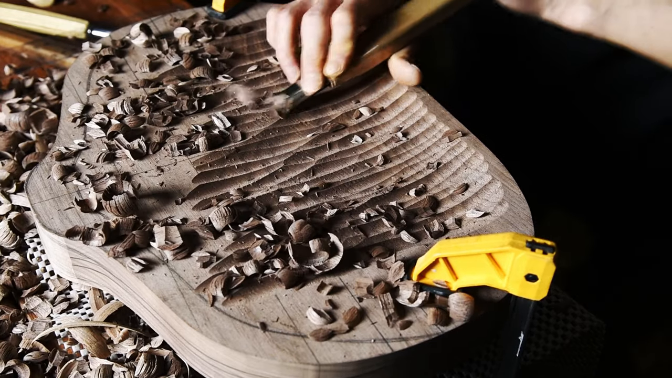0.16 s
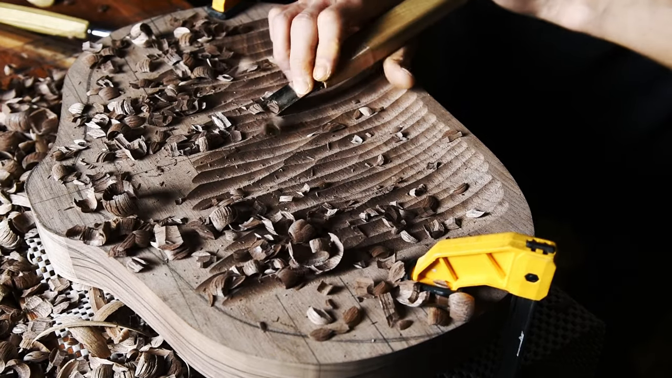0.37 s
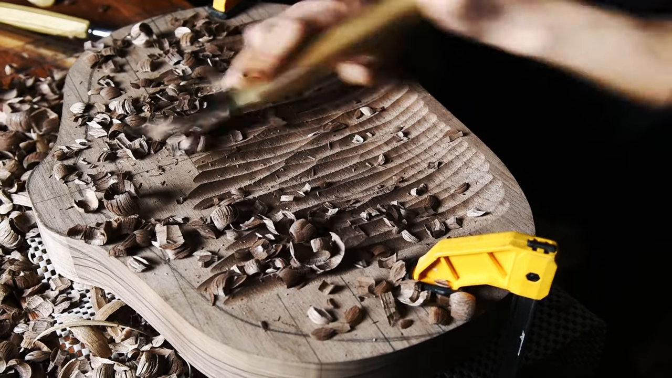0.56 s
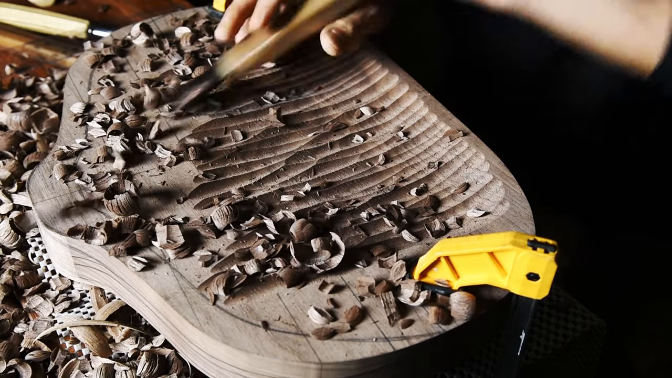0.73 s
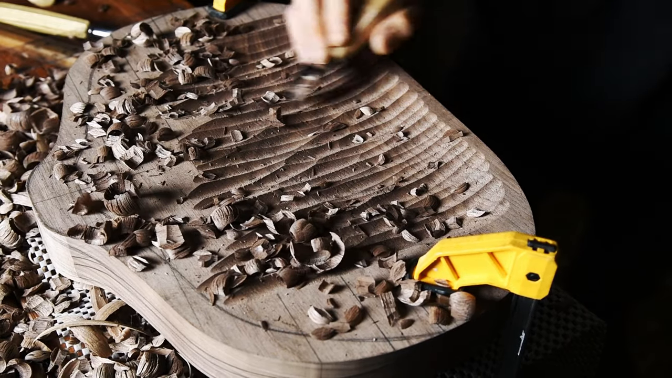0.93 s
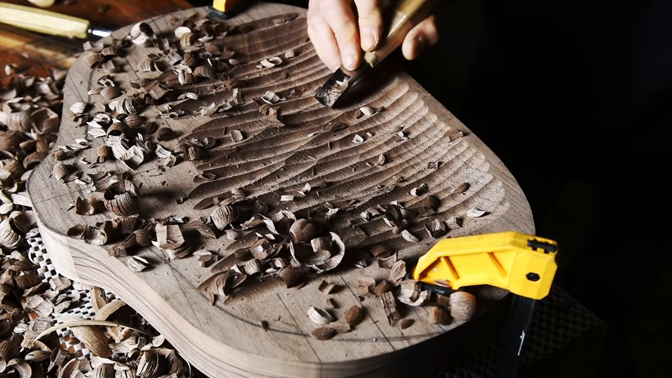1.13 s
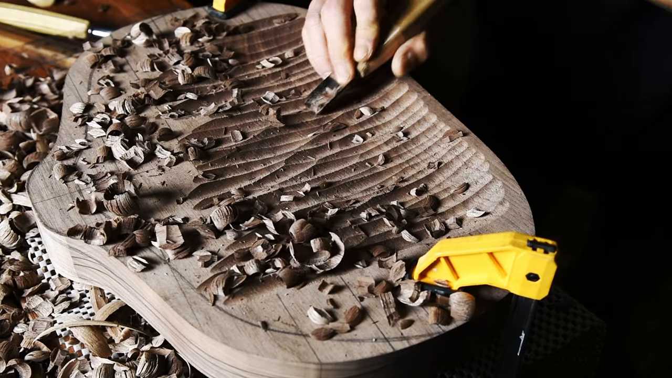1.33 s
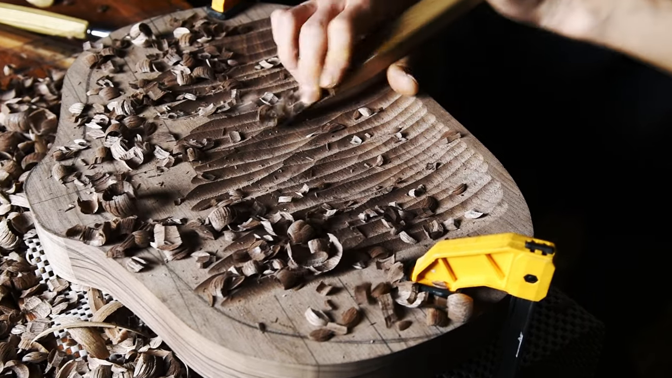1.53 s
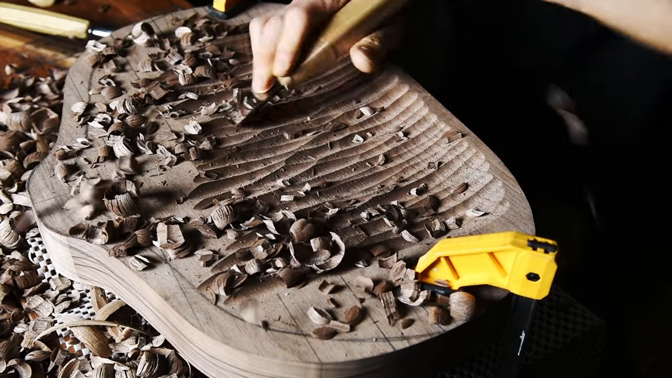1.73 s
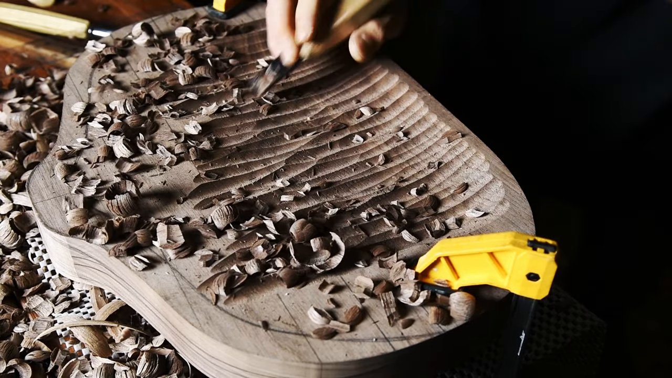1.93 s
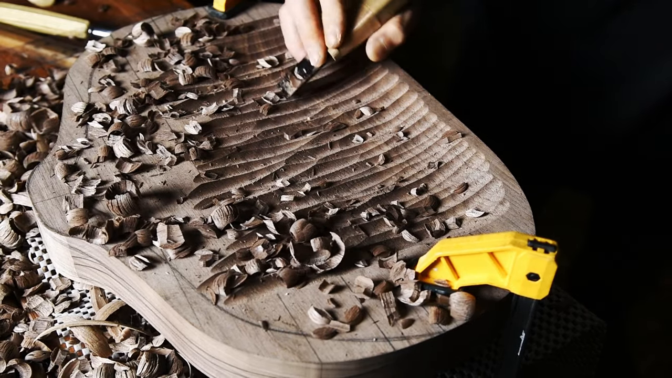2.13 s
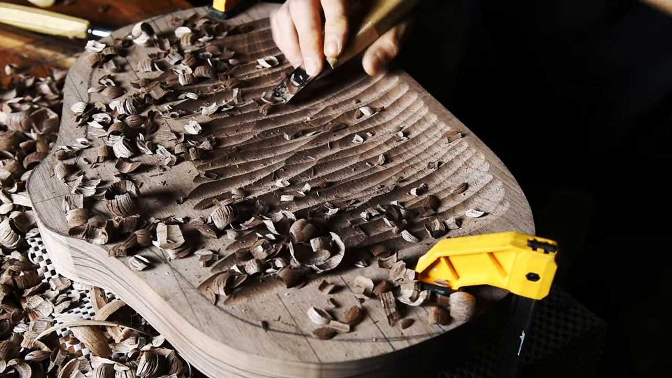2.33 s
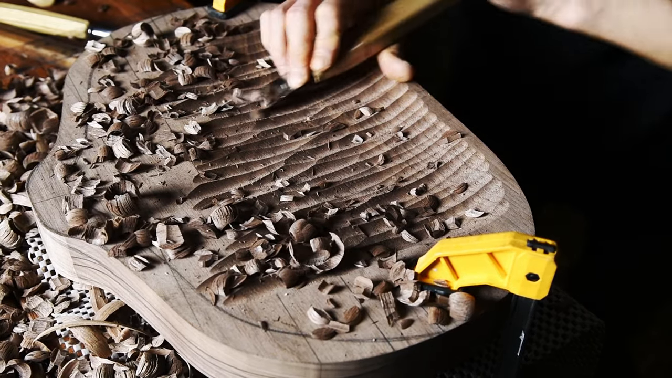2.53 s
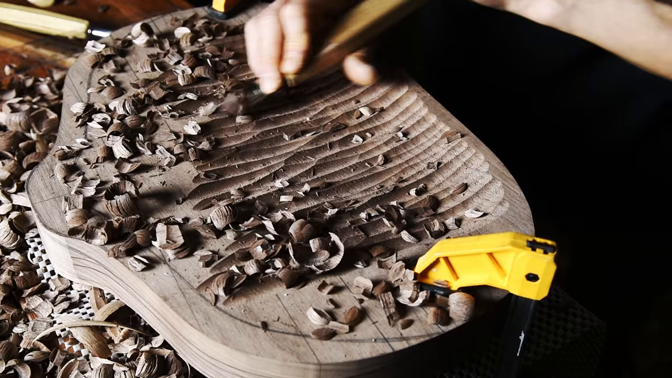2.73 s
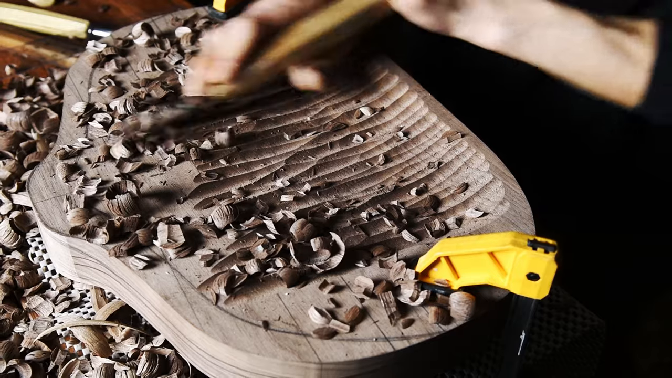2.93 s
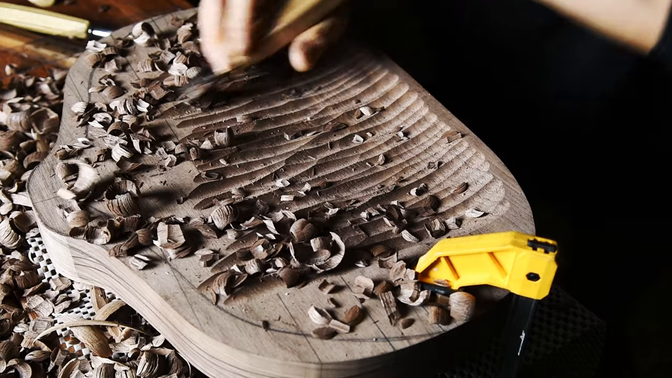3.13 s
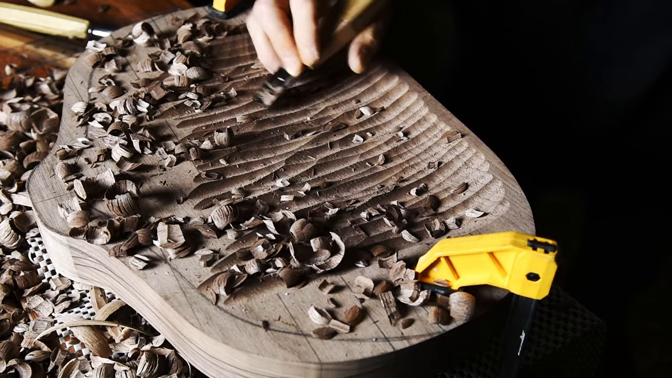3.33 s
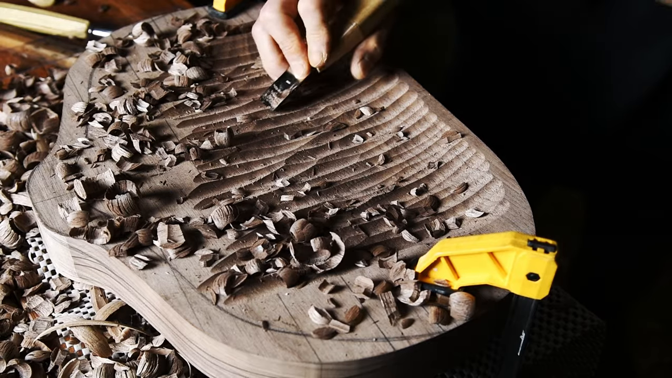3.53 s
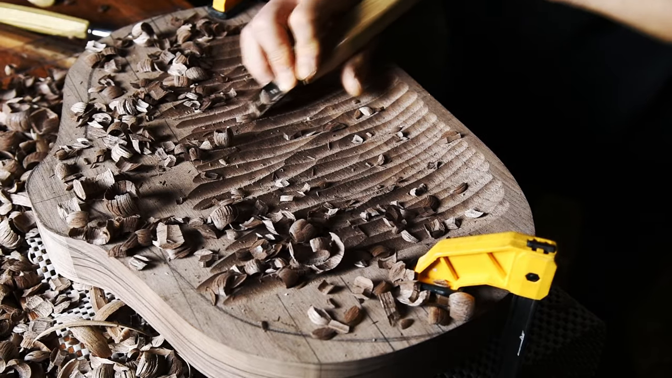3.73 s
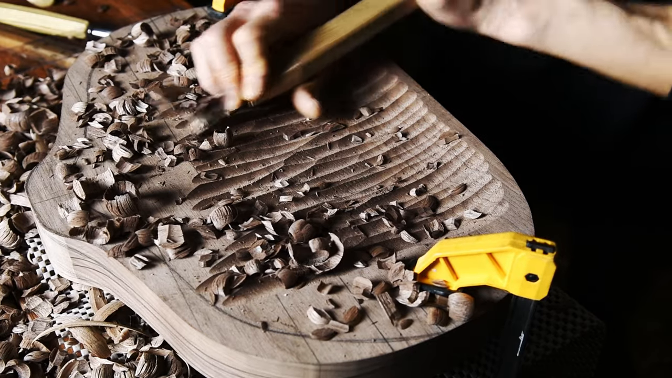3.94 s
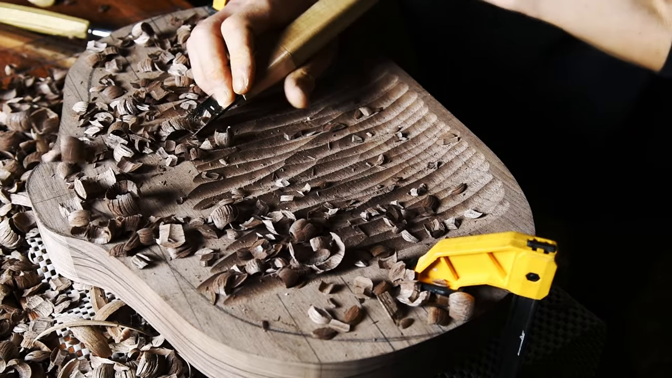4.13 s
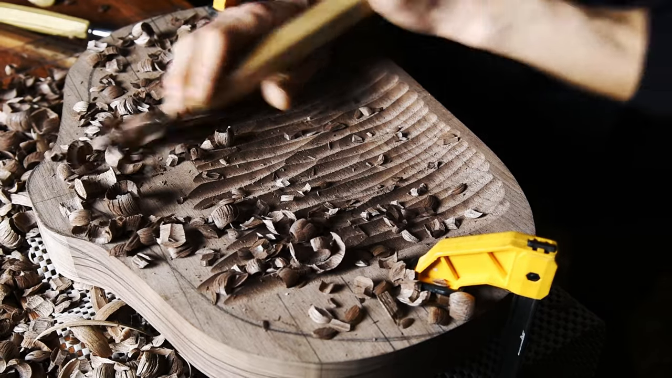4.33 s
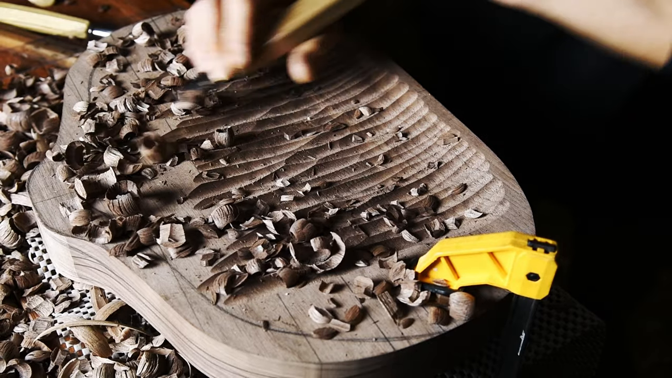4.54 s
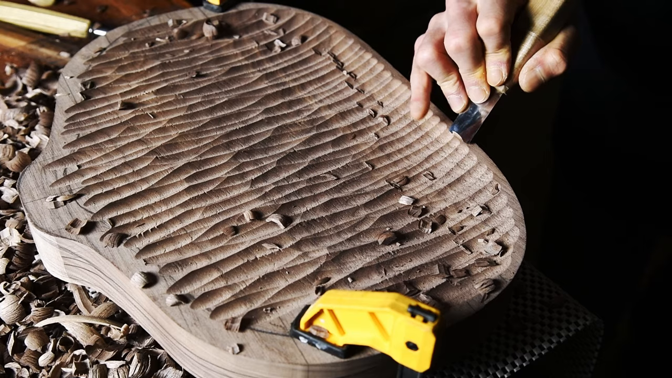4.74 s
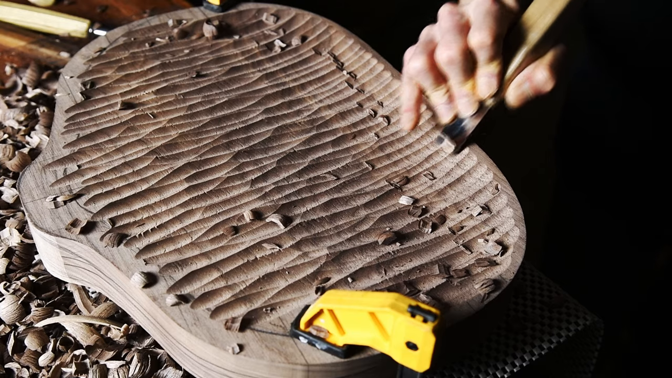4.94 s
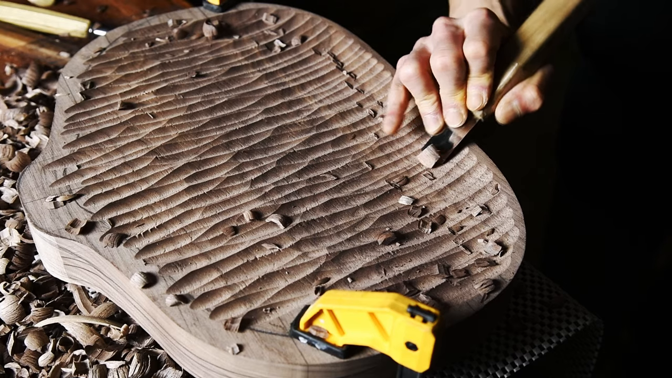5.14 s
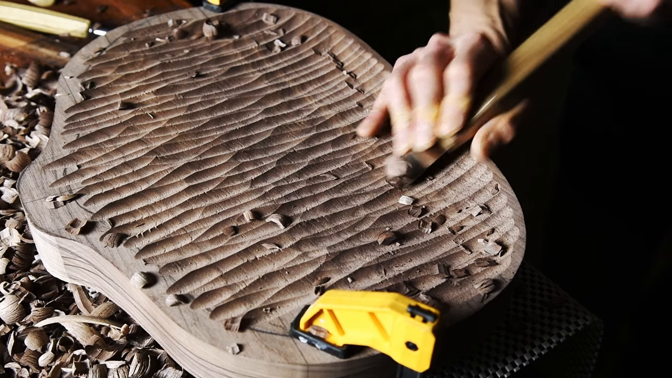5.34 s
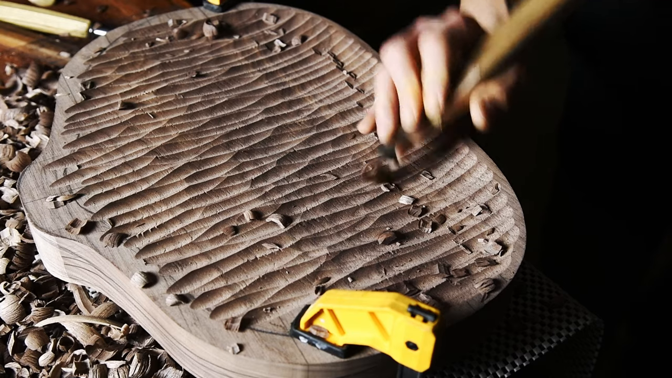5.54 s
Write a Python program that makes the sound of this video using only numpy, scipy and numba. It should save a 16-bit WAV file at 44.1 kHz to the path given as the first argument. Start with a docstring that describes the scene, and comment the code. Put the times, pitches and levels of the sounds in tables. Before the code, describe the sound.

A narrow hand gouge cuts a clamped hardwood slab in a small workshop, heard closely in mono over a barely audible steady hush. From 0 to 0.27 s a rough scrape crackles with irregular steel and fibre snaps; a very brief scratch follows at 0.5 s. Tiny high chip ticks fall around 0.3, 0.5 and 0.8 s. A push starts almost inaudibly near 1.2 s, swelling into dense gritty rasping and sharp cracks until 1.63 s; bright ticks follow at 1.77 and 2.17 s. Longer pushes swell from 2.3 to 2.9 s and from 3.5 to 4.0 s, their woody and bright tearing colour shifting as the edge digs deeper. A short scrape comes at 4.25 s. Short reverberation trails each stroke. From 4.64 s the sound is closer and drier: faint touches, then low, muted scraping and hollow knocks at the rim, ending with a soft gritty cut around 5.2-5.4 s.

```python
"""A narrow hand gouge pares shavings from a clamped hardwood slab in a small workshop, over a faint steady hush.
Two short pushes open, then swelling ones from 1.2, 2.3 and 3.5 s and a short one at 4.2 s, all mid-slab; a second
scene from 4.64 s, miked closer, cuts at the rim. Slips of the edge ring the steel, crack fibres and knock the slab:
noise bursts through resonances; between slips the shaving shears off as a fine gritty rasp. Loose chips, decaying
sine ticks, fall after the first, second and third pushes. Decaying noise bands make the room ring on."""
import sys
import numpy as np
from scipy import signal
from scipy.fft import rfft, irfft
from scipy.io import wavfile
from scipy.ndimage import uniform_filter1d
from numba import njit

SR = 44100
rng = np.random.default_rng(int(sys.argv[2]) if len(sys.argv) > 2 else 0)


def field_ratio(decibels):
    """Amplitude ratio for a level in dB (20 dB per decade); scalars and array-likes work."""
    return 10 ** (np.asarray(decibels, dtype=float) / 20)


def store_pcm(level_fs):
    """Save levels as 16-bit WAV."""
    pcm = np.round(np.clip(level_fs, -1, 1) * 32767).astype(np.int16)
    wavfile.write(sys.argv[1], SR, np.atleast_2d(pcm).T)


N = 250488
T = np.arange(N) / SR

# clearest slips and touches of the edge: start_s, steel_db, crack_db (relative force levels)
CLEAR_SLIPS = [(0.0082, -20, -29.5), (0.038, -18, -19), (0.0525, -20, -28.5), (0.0884, -18, -26),
               (0.1182, -23, -14), (0.1352, -11.5, -19.5), (0.1499, -25.5, -22), (0.1614, -27.5, -29),
               (0.1874, -28.5, -27), (0.2075, -15, -17.5), (0.2444, -15.5, -19.5), (0.5017, -12.5, -14.5),
               (0.517, -18.5, -29), (1.198, -51.5, -83.5), (1.212, -42, -72), (1.24, -40.5, -54.5),
               (1.2647, -32.5, -56.5), (1.287, -27.5, -39), (1.3238, -28, -39), (1.3452, -24, -51.5),
               (1.3585, -36, -35.5), (1.387, -19.5, -28), (1.4275, -23, -27.5), (1.4408, -31.5, -24.5),
               (1.4679, -15.5, -21.5), (1.4731, -13.5, -22.5), (1.487, -32, -19.5), (1.5027, -20, -17.5),
               (1.5221, -37, -18), (1.5469, -16, -39.5), (1.5715, -10.5, -15.5), (1.599, -18.5, -24.5),
               (1.8976, -44.5, -54), (2.198, -55, -68.5), (2.2686, -47.5, -64), (2.294, -40.5, -44),
               (2.3283, -40.5, -67), (2.3554, -36, -51), (2.3735, -32, -48.5), (2.394, -26, -41),
               (2.4384, -25, -38), (2.4596, -38, -47), (2.4978, -36.5, -34), (2.5172, -17, -37),
               (2.538, -28.5, -37), (2.5553, -27.5, -41), (2.5766, -46, -47), (2.6293, -40, -34),
               (2.6485, -30, -35), (2.6608, -28, -28.5), (2.6858, -32, -24.5), (2.7176, -18.5, -25.5),
               (2.7734, -21, -15.5), (2.8223, -15, -21.5), (2.8435, -37, -36), (2.8684, -25, -20.5),
               (2.8869, -14.5, -26.5), (2.9107, -23, -28), (3.281, -56.5, -79), (3.509, -52.5, -61),
               (3.5402, -37.5, -60), (3.576, -41, -51), (3.599, -35.5, -49), (3.6285, -40, -43.5),
               (3.6504, -26, -33), (3.679, -31.5, -47.5), (3.6929, -32, -36), (3.7144, -28.5, -29),
               (3.735, -33.5, -22.5), (3.7564, -23.5, -39), (3.78, -21, -28), (3.7926, -31.5, -25),
               (3.8082, -28, -30.5), (3.8235, -15.5, -21), (3.8348, -15.5, -17.5), (3.849, -30, -21.5),
               (3.8772, -47.5, -17), (3.893, -15, -25), (3.9138, -24, -17), (3.9235, -13.5, -13.5),
               (3.9444, -25, -25), (3.962, -49, -30.5), (3.9821, -41, -34), (4.2467, -43, -38),
               (4.2603, -21, -24.5), (4.2768, -28, -21.5), (4.2927, -34, -15.5), (4.306, -18.5, -25.5),
               (4.6591, -32, -78), (4.743, -38.5, -46.5), (4.8296, -34, -48), (4.8415, -23, -40.5),
               (4.8905, -33, -47), (4.917, -44.5, -38.5), (5.0167, -29.5, -38), (5.0387, -37.5, -37),
               (5.0923, -31.5, -34), (5.1446, -44, -36.5), (5.2114, -42, -39.5)]
# pressure on the edge, one curve a stretch of cutting (longer pushes may take two): time_s, pressure_db
STRETCHES = [
    [(0.0, -32), (0.154, -33.5), (0.27, -33.5)],
    [(0.49, -33.5), (0.51, -24.5), (0.527, -15), (0.548, -25.5)],
    [(1.15, -63.5), (1.49, -22.5), (1.56, -27), (1.58, -21), (1.63, -25)],
    [(2.26, -63.5), (2.544, -31.5), (2.59, -33.5)],
    [(2.625, -31), (2.81, -31.5), (2.889, -26.5), (2.94, -30.5)],
    [(3.48, -68), (3.736, -34.5), (3.9, -26), (3.99, -29.5)],
    [(4.245, -36), (4.275, -29.5), (4.34, -28.5)],
    [(4.885, -34), (4.942, -29.5), (5.0, -33)],
    [(5.0, -45.5), (5.164, -50.5), (5.19, -47.5)],
    [(5.213, -39), (5.23, -36.5), (5.307, -30), (5.39, -43)],
]
# wood under each stretch at reference pressure: rumble_db, hiss_db, lean_db (lean on the bench re rumble)
WOOD_LEVELS = [(-33.5, -35, -19.5), (-44.5, -37, -17.5), (-37.5, -40, -13), (-35, -37.5, -8),
               (-38, -34.5, -7.5), (-37, -35.5, -7), (-30.5, -32.5, -14), (-24.5, -33.5, -39.5),
               (-21, -27, -26.5), (-37, -34.5, -23)]
# how deep the edge is buried: time_s, depth_0_to_1
CUT_DEPTH = [(0, 0.4), (.3, 0.09), (.5, 0.29), (.56, .3), (1.2, 0.4), (1.5, 0.06), (1.62, 0.4), (2.2, 0),
             (2.5, 0.06), (2.7, 0.47), (2.9, 0.54), (3.45, 0), (3.75, 0.16), (3.95, 0.65), (4.3, 0.84),
             (4.6, 0.07), (5.15, 0.38), (5.25, 0.73)]
# steel and handle modes: centre_hz, width_hz, mid_shallow_db, mid_deep_db, rim_shallow_db, rim_deep_db
STEEL_MODES = [(1162, 106, -1.5, -10, 10, -33), (1306, 72.5, 2.5, -2.5, 7, -6),
               (1629, 140, -18, -0.5, -22, 0.5), (1956, 70, -13, 9.5, -31, 11),
               (2470, 290, -23.5, -1, -10.5, -6), (2864, 170, -10, -8.5, -8, 2.5),
               (3436, 230, -17, -2, -9, -14.5), (4498, 690, -14.5, -15.5, -18, -8),
               (4915, 680, -19.5, 4.5, -8.5, -37.5), (5490, 120, -21.5, -15.5, -21, -3.5)]
# slab modes: centre_hz, width_hz, mid_shallow_db, mid_deep_db, rim_shallow_db, rim_deep_db
SLAB_MODES = [(289.7, 26, 2.5, -9, -33, -20), (327, 58, -6, -2, -39.5, -14), (450, 28, -2, -4.5, -20.5, 8),
              (505.7, 29, -8, -11, -2.5, -8), (592, 43.7, -6.5, 0.5, 0.5, 4),
              (661.5, 41.3, -8.5, 7.5, -3, -1.5), (772, 160, -10.5, -5, -24, 1.5)]
# broad humps of cracking fibres: centre_hz, width_hz, mid_shallow_db, mid_deep_db, rim_shallow_db, rim_deep_db
FIBRE_HUMPS = [(4700, 2900, -1.5, -9.5, -8, -31), (7330, 600, 7, 3.5, 15.5, -13),
               (7470, 720, 5, 4, 1, 11.5), (8970, 3200, -1, -4, -12.5, 1.5),
               (11900, 5300, -4.5, -5.5, -8.5, -3), (15230, 2340, -1, -7, -5.5, -5)]
# bench modes under the slab: centre_hz, width_hz, level_db (re lean)
BENCH_MODES = [(80.5, 38, -9.5), (136, 10, -10), (182.6, 41, 3.5)]
# loose chips falling on the slab: start_s, peak_db (before the high-pass), pitch_hz
CHIP_FALLS = [(0.288, -29, 13900), (0.4853, -28, 11880), (0.7716, -46, 10500), (0.8917, -48, 12340),
              (1.7666, -19.5, 10210), (1.8996, -40.5, 14200), (2.163, -21.5, 13340), (2.1732, -26.5, 10750),
              (2.1935, -50, 13900)]
# reverberation: centre_hz, t60_s, level_db (relative)
ROOM_DECAY = [(100, 0.39, 3.5), (300, 0.51, 0), (746, 0.53, 4), (1330, 0.62, -6.5), (2500, 0.49, 1),
              (4700, 0.55, -0.85), (9150, 0.35, -5), (14000, 0.39, 0)]
# background spectrum: centre_hz, density_db_per_hz (relative)
HUSH_SPECTRUM = [(18, -42), (30, -22.5), (103, -6), (295, -5), (437, -11), (801, -4.5), (1810, -17.5),
                 (9220, -30), (10800, -26), (16000, -28.5)]

RIM_SCENE_FROM_S = 4.64  # first scene, mid-slab, before; second, closer scene, at the rim, after
KNOCK_FROM_S = 4.8  # the edge bites the rim and slips knock harder
REFERENCE_DB = -30
RUMBLE_SLOPE, HISS_SLOPE = 1.27, 1.38  # dB per dB of pressure
TOP_HZ = 16000


def gouge():
    """One uneven force, slips over a gritty rasp, drives steel, slab, bench and fibres."""
    rumble_db, hiss_db, lean_db = np.transpose(WOOD_LEVELS)
    rasp_db = np.full(len(WOOD_LEVELS), REFERENCE_DB)
    start_s, steel_db, crack_db = slips(rasp_db, hiss_db)
    push_s = slip_length_s(steel_db, 2.6, 0.32)
    crack_s = slip_length_s(crack_db, 1.74, 0.19)
    tears = grit(900, 5.0, 0.0017)
    rasp = (0.76 + 0.39 * tears) * shear(rasp_db, 1)
    hiss = tears * shear(hiss_db, HISS_SLOPE)
    rumble = shear(rumble_db, RUMBLE_SLOPE)
    lean = shear(rumble_db + lean_db, RUMBLE_SLOPE)
    tool = steel(start_s, steel_db, push_s, rasp)
    wood = slab(start_s, steel_db, push_s, rumble)
    return tool + wood + bench(lean) + fibres(start_s, crack_db, crack_s, hiss)


def steel(start_s, steel_db, push_s, rasp):
    """Slips, jerks and rasp ring the blade and handle, whose radiation falls off in the treble."""
    push = bursts(start_s, steel_db - 5.0, push_s) + field_ratio(-6.0) * rasp
    # each slip also jerks the tool once: a blunt blow that rings the lower modes
    jerk = bursts(start_s + 0.573 * push_s, steel_db - 3.5, .00007)
    tool = ring(push * rng.standard_normal(N) + jerk, STEEL_MODES)
    return signal.sosfilt(signal.butter(2, 7000, fs=SR, output="sos"), tool)


def slab(start_s, steel_db, push_s, rumble):
    """The heavy slab feels a smooth push under the cut; each slip adds a knock."""
    knock_db = steel_db + np.where(start_s < KNOCK_FROM_S, -18, -3.5)
    push = bursts(start_s, knock_db, 0.93 * push_s) + rumble
    return ring(push * rng.standard_normal(N), SLAB_MODES)


def bench(lean):
    """Noisy leaning on the slab excites fixed low modes of the bench."""
    force = lean * rng.standard_normal(N)
    out = np.zeros(N)
    for hz, width_hz, db in BENCH_MODES:
        noise_gain = np.sqrt(np.pi * width_hz / SR)
        out += field_ratio(db) * band(force, hz, width_hz) / noise_gain
    return out


def fibres(start_s, crack_db, crack_s, hiss):
    """Snapping and shearing fibres: noise through broad humps that rise with depth."""
    tearing = bursts(start_s, crack_db, crack_s) + hiss
    return ring(tearing * rng.standard_normal(N), FIBRE_HUMPS, rise_share=0.17)


def slips(rasp_db, hiss_db):
    """Clear slips, and between them lesser chatter at uneven random gaps, its level following the pressure."""
    clear_s, clear_steel_db, clear_crack_db = np.transpose(CLEAR_SLIPS)
    chance = np.clip(rng.standard_normal((3, N // 200)), -2, 2)
    gap_s, gap_spread, scatter_db, clearance_s = .02, 0.48, 3, .011
    chatter_s = np.cumsum(gap_s * np.exp(gap_spread * chance[0]))
    mid_slab = chatter_s < RIM_SCENE_FROM_S
    steel_db = push_law(chatter_s, rasp_db, 1).max(axis=0) + np.where(mid_slab, -3, -0.5)
    crack_db = push_law(chatter_s, hiss_db, HISS_SLOPE).max(axis=0) + np.where(mid_slab, 0.5, -3.5)
    nearest_s = np.abs(chatter_s[:, None] - clear_s).min(axis=1)
    free = np.isfinite(steel_db) & (nearest_s > clearance_s)
    steel_db = (steel_db + scatter_db * chance[1])[free]
    crack_db = (crack_db + scatter_db * chance[2])[free]
    return np.r_[clear_s, chatter_s[free]], np.r_[clear_steel_db, steel_db], np.r_[clear_crack_db, crack_db]


def slip_length_s(level_db, reference_ms, shorter_db_per_db):
    """Time to the peak of a slip's force: harder slips are shorter."""
    length_ms = reference_ms * field_ratio(-shorter_db_per_db * (level_db - REFERENCE_DB))
    return np.clip(length_ms, .3, 6) / 1000


def push_law(time_s, at_db, slope):
    """Level in dB, one row a stretch of cutting: it follows the pressure and is silent outside the stretch."""
    out = []
    for stretch, reference_level_db in zip(STRETCHES, at_db):
        push_s, pressure_db = np.transpose(stretch)
        db = reference_level_db + slope * (np.interp(time_s, push_s, pressure_db) - REFERENCE_DB)
        inside = (time_s >= push_s[0]) & (time_s < push_s[-1])
        out.append(np.where(inside, db, -np.inf))
    return np.array(out)


def shear(at_db, slope):
    """Amplitude of the steady cut, summed over stretches, averaged over 5 ms for soft ends."""
    return uniform_filter1d(field_ratio(push_law(T, at_db, slope)).sum(axis=0), SR // 200)


def grit(per_s, spread_db, grain_s):
    """Dense random tears of unequal size, each decaying exponentially; rms 1."""
    hits = rng.random(N) < per_s / SR
    sizes = hits * field_ratio(spread_db * np.clip(rng.standard_normal(N), -2, 2))
    return unit(signal.lfilter([1], [1, -np.exp(-1 / (grain_s * SR))], sizes))


def bursts(start_s, level_db, length_s):
    """Envelope: a rounded swell and fall at each start, peaking after its own length."""
    out, t = np.zeros(N + SR), np.arange(SR // 20) / SR
    for s, db, length in np.broadcast(start_s, level_db, length_s):
        i = int(s * SR)
        out[i:i + len(t)] += field_ratio(db) * t / length * np.exp(1 - t / length)
    return out[:N]


def ring(force, modes, rise_share=0.):
    """Sum of resonances whose shares follow the depth and scene; white force about keeps its rms."""
    depth = np.clip(np.interp(T, *np.transpose(CUT_DEPTH)), 0, 1)
    hz, width_hz, mid_shallow, mid_deep, rim_shallow, rim_deep = np.transpose(modes)[:, :, None]
    shallow_db = np.where(T < RIM_SCENE_FROM_S, mid_shallow, rim_shallow)
    deep_db = np.where(T < RIM_SCENE_FROM_S, mid_deep, rim_deep)
    # each mode's share wanders at random, so bright bands shift
    wander_db, wander_per_s = 2.5, 25
    steps = rng.standard_normal((len(modes), 400))
    wander = np.array([np.interp(T * wander_per_s, np.arange(len(row)), row) for row in steps])
    gain = field_ratio(shallow_db + depth * (deep_db - shallow_db) + wander_db * wander)
    gain = gain / np.sqrt(np.sum(gain ** 2 * np.pi * width_hz / SR, axis=0))
    hz = np.minimum(hz * (1 + rise_share * (depth - .5)), TOP_HZ)
    out = np.zeros(N)
    for k in range(len(modes)):
        sign = (-1) ** k
        out += sign * glide(force * gain[k] + 1e-18, hz[k], width_hz[k, 0])
    return out


@njit
def glide(x, hz, width_hz):
    """State-variable resonance whose centre moves every sample, gain 1 at the centre."""
    y, band_state, low_state = np.empty(len(x)), 0., 0.
    for i in range(len(x)):
        g, k = np.tan(np.pi * hz[i] / SR), width_hz / hz[i]
        v = (band_state + g * (x[i] - low_state)) / (1 + g * (g + k))
        band_state = 2 * v - band_state
        low_state += 2 * g * v
        y[i] = k * v
    return y


def band(x, hz, width_hz):
    """Two-pole resonance, gain 1 at the centre."""
    return signal.lfilter(*signal.iirpeak(hz, hz / width_hz, fs=SR), x)


def unit(x):
    """Scale to rms 1."""
    return x / np.sqrt(np.mean(x ** 2))


def chips():
    """Tiny dry ticks: a few cycles at the chip's pitch, high-passed."""
    out = np.zeros(N)
    for start_s, peak_db, pitch_hz in CHIP_FALLS:
        out += bursts([start_s], peak_db, 0.000089) * np.sin(2 * np.pi * pitch_hz * (T - start_s))
    return signal.sosfilt(signal.butter(4, 6500., "high", fs=SR, output="sos"), out)


def room(x):
    """Diffuse tail: noise bands, each dying at its own rate, behind a short gap."""
    t, tail = np.arange(SR) / SR, np.zeros(SR)
    centre_hz, t60_s, level_db = np.transpose(ROOM_DECAY)
    for hz in 60 * 2 ** np.arange(0, 8.3, .5):
        decay_s = np.interp(np.log(hz), np.log(centre_hz), t60_s)
        db = np.interp(np.log(hz), np.log(centre_hz), level_db)
        noise = band(rng.standard_normal(SR), hz, hz / 3)
        tail += field_ratio(db) * noise * np.exp(-np.log(1000) * t / decay_s)
    tail *= np.clip((t - .004) / 0.0017, 0, 1)
    return signal.fftconvolve(x, tail / np.sqrt(np.sum(tail ** 2)))[:N]


def hush():
    """Steady faint background of room and microphone: spectrally shaped noise."""
    hz, density_db = np.transpose(HUSH_SPECTRUM)
    f = np.maximum(np.fft.rfftfreq(N, 1 / SR), 1)
    shape = field_ratio(np.interp(np.log(f), np.log(hz), density_db))
    return field_ratio(-71.5) * unit(irfft(rfft(rng.standard_normal(N)) * shape, N))


def scene():
    """Tool and chips, their echo and the hush."""
    tool, ticks = gouge(), chips()
    # the second scene is miked closer, so drier
    send = field_ratio(np.where(T < RIM_SCENE_FROM_S, -9, -12.5))
    echo = room(send * (tool + field_ratio(0.5) * ticks))
    return (tool + ticks + echo + hush())[None]


def top_cut(x):
    """Nothing passes above the cut-off."""
    return signal.sosfilt(signal.butter(12, 16990, fs=SR, output="sos"), x)


def record(dry):
    """The microphone drops the deep bass and the recorder cuts the top."""
    x = signal.sosfilt(signal.butter(2, 60., "high", fs=SR, output="sos"), dry)
    x = signal.sosfilt(signal.butter(10, TOP_HZ, fs=SR, output="sos"), x)
    return top_cut(x)


dry = scene()
out = record(dry)
store_pcm(out)
```